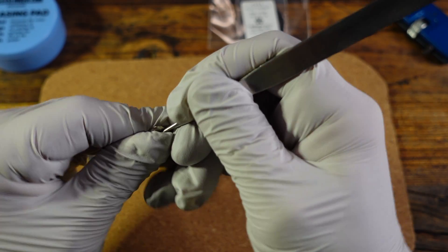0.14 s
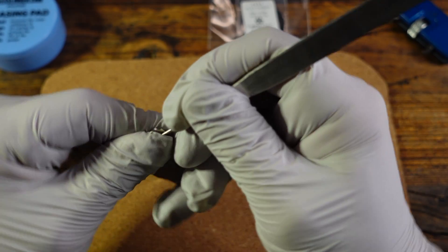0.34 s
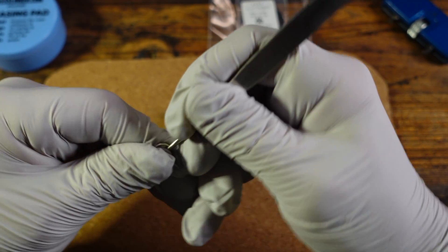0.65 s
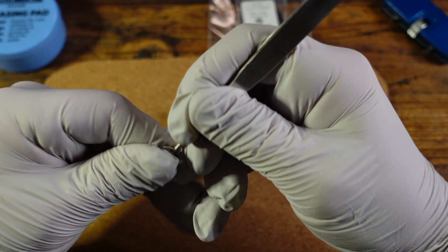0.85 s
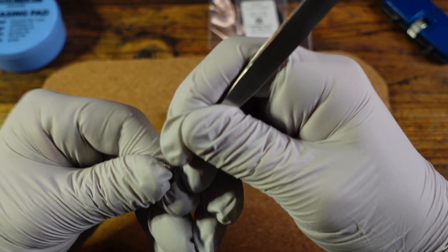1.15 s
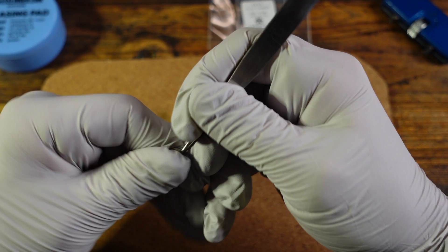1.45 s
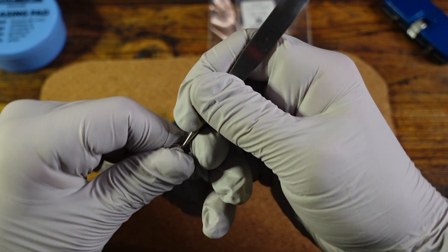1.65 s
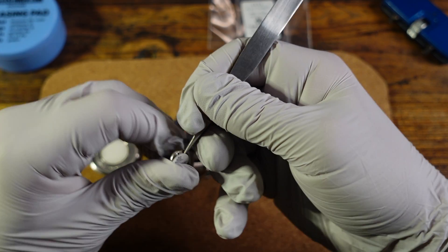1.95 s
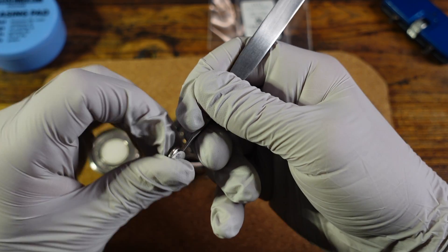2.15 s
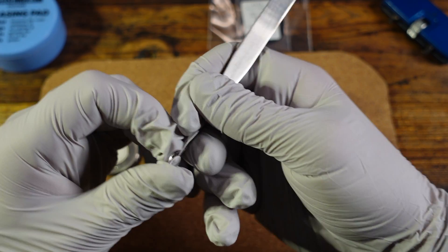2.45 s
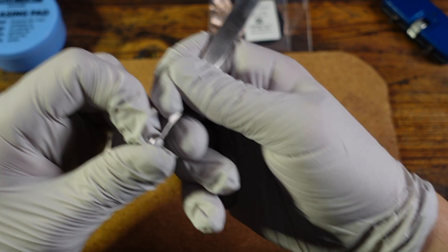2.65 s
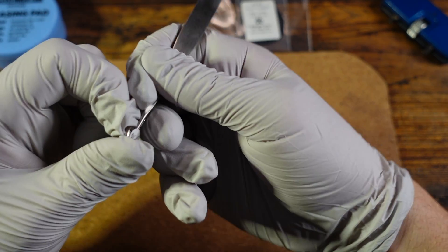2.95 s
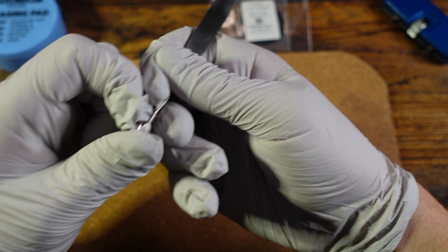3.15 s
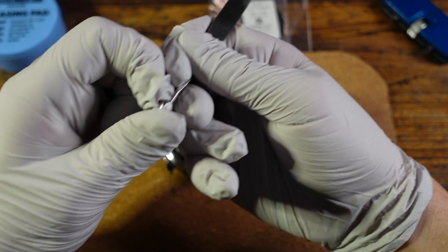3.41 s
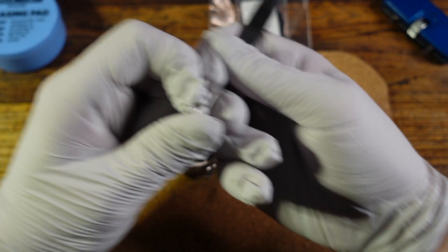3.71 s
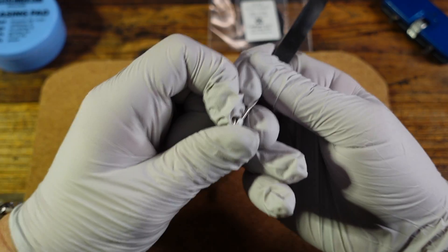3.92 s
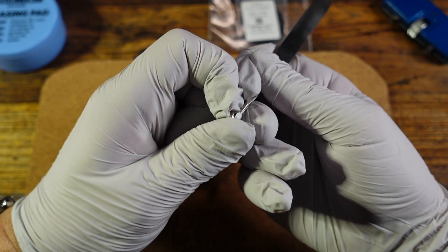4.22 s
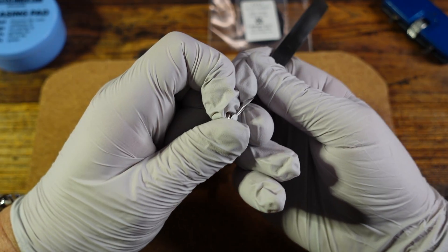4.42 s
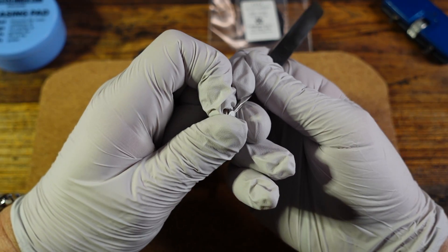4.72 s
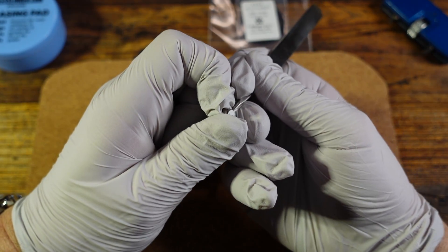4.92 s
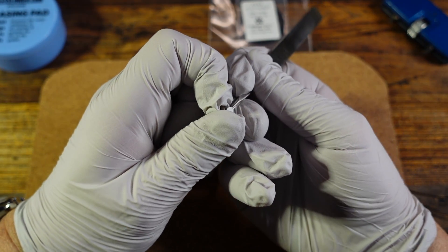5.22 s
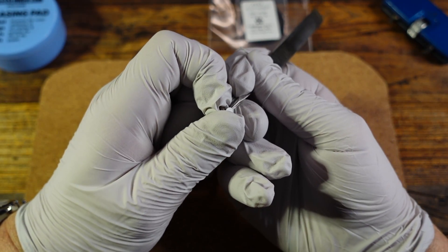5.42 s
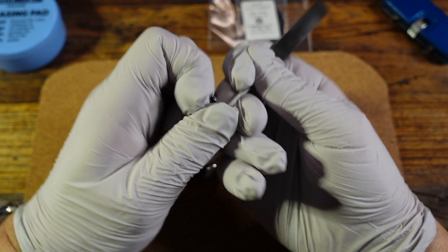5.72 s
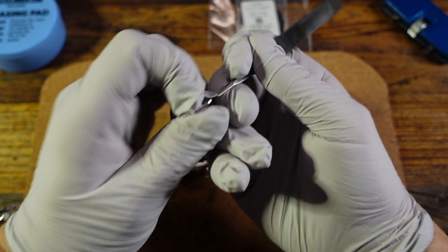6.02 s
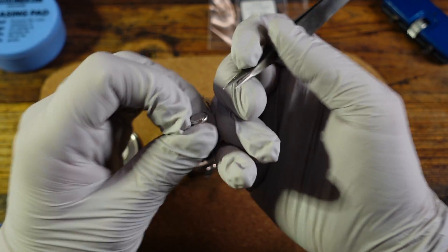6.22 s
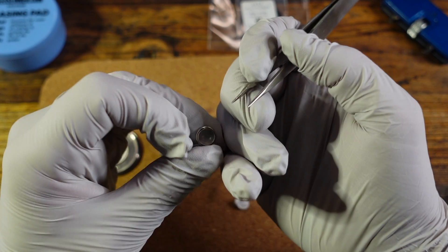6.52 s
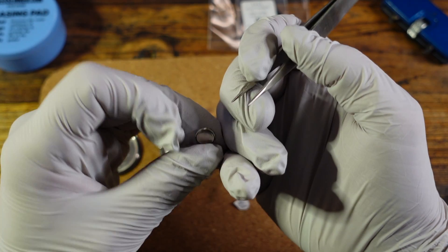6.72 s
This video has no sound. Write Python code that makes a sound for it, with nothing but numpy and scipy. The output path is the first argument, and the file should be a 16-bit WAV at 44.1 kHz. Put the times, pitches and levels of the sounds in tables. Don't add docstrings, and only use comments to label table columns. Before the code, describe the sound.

Tweezers tick, snap and scrape on a tiny metal cell at a wooden bench, soft thuds and distant knocks over quiet room hum.

```python
import sys
import numpy as np
from scipy import signal
from scipy.fft import rfft, irfft, next_fast_len
from scipy.io import wavfile
from scipy.ndimage import uniform_filter1d

SR = 44100
rng = np.random.default_rng(int(sys.argv[2]) if len(sys.argv) > 2 else 0)


def volts(x):
    e = np.asarray(x, float) / 20
    return 10 ** e


def store_wav(level_fs):
    pcm = np.round(np.clip(np.atleast_2d(level_fs), -1, 1) * 32767)
    wavfile.write(sys.argv[1], SR, pcm.T.astype(np.int16))


N = 302460


def unit(x):
    return x / np.sqrt(np.mean(x ** 2) + 1e-20)


def along(points, hz):
    f, v = np.transpose(points)
    return np.interp(np.log(hz + 1), np.log(f + 1), v)


def add(track, s, sound):
    part = track[round(s * SR):][:len(sound)]
    part += sound[:len(part)]


def ring(hz, gains, t60, attack):
    t = np.arange(int(np.clip(np.max(t60), .002, .4) * SR))[:, None] / SR
    decay = np.exp(-np.log(1000) * t / t60)
    x = (gains * decay * np.sin(2 * np.pi * hz * t)).sum(1)
    x = x * (1 - np.exp(-t[:, 0] / attack))
    return x / np.abs(x).max()


def shaped(gain, size=256):
    hz, t, z = signal.stft(rng.standard_normal(N), SR, nperseg=size)
    return signal.istft(z * gain(hz[:, None], t), SR, nperseg=size)[1][:N]


def filtered(x, response):
    m = next_fast_len(N + SR // 2)
    return irfft(rfft(x, m) * response(np.fft.rfftfreq(m, 1 / SR)), m)[..., :N]


def resonance(hz, centre_hz, width_hz):
    return 1j * hz * width_hz / (centre_hz ** 2 - hz ** 2 + 1j * hz * width_hz)


def noise_band(centre_hz, width_hz):
    return unit(filtered(rng.standard_normal(N), lambda hz: resonance(hz, centre_hz, width_hz) ** 2))


def stroke(t, start, end, db, fade):
    outside = np.maximum(np.maximum(start - t, t - end), 0)
    return volts(db - 20 * outside / fade)


def power(rows, t):
    return sum(stroke(t, *row) ** 2 for row in rows)


# frequency_hz, level_db [dB per Hz]
FLOOR = [(25, -30), (45, -11), (100, -14), (150, -11), (220, -13), (323, -16), (400, -18.5), (500, -23.5),
         (800, -21), (1240, -26.5), (2800, -29), (13900, -31.5), (15800, -33), (16500, -52)]
# centre_hz, width_hz, level_db
MACHINE = [
    (149.85, 10, -71.5),
    (800, 77, -79),
    (22.04, 3, -70),
]


def floor():
    def gain(hz, t):
        field = rng.standard_normal((len(hz), len(t)))
        field = uniform_filter1d(uniform_filter1d(field, 3, 0), 4, 1)
        wander_db = 1.1 * unit(field) / (1 + hz / 900)
        return volts(along(FLOOR, hz) + wander_db)
    hum = sum(volts(db) * noise_band(centre_hz, width_hz) for centre_hz, width_hz, db in MACHINE)
    return volts(-63.5) * unit(shaped(gain, size=4096)) + hum


# frequency_hz, t60_s
ROOM = [(200, 0.34), (2000, 0.49), (6000, 0.36), (15000, 0.22)]
# delay_s, level_db, blur_s
WALLS = [
    (.004, -15.5, .001),
    (.0067, -22.5, .0008),
    (0.0105, -15, .0013),
    (.021, -37, .001),
]


def room(x):
    hz, t, z = signal.stft(rng.standard_normal(SR // 2), SR, nperseg=256)
    decay = volts(-60 * t / along(ROOM, hz)[:, None])
    tail = signal.istft(z * decay, SR, nperseg=256)[1]
    answer = volts(-13.5) * tail / np.linalg.norm(tail)
    age = np.arange(len(tail)) / SR
    for delay_s, db, blur_s in WALLS:
        echo = rng.standard_normal(len(tail)) * np.exp(-((age - delay_s) / blur_s) ** 2 / 2)
        answer = answer + volts(db) * echo / np.linalg.norm(echo)
    return signal.fftconvolve(x, answer)[:N]


# start_s, level_db [peak], tilt_db [per octave], t60_s, panel_hz
KNOCKS = [
    (4.465, -39.5, -6.5, 0.51, 1490),
    (4.719, -42, -2, 0.53, 880),
    (4.868, -42.5, -4.5, 0.48, 1000),
    (5.071, -51.5, 0, 0.42, 1400),
    (5.799, -39.5, -3.5, 0.55, 905),
]
# centre_hz, width_hz, level_db
CUPBOARD = [(431, 35, -7), (785, 24, -5), (935, 14, -16.5), (1050, 38, -6.5), (1330, 14, -13),
            (1470, 17, -5), (1612, 26, -12.5), (2060, 14, -10), (2480, 22, -26)]


def knocks():
    def gain(hz, t):
        total = 0
        for s, db, tilt_db, t60, panel_hz in KNOCKS:
            age = np.maximum(t - s, 0)
            life = t60 * (1 + hz / 3000) ** -.6
            panel = 1 + 0.91 * np.abs(resonance(hz, panel_hz, 440))
            fall = volts(db + 14.0 + tilt_db * np.log2(1 + hz / 2000) - 60 * age / life)
            total = total + panel * fall * (1 - np.exp(-age / 0.0015))
        return total

    def body(hz):
        response = volts(-15.5) * resonance(hz, 990, 1640)
        for k, (centre_hz, width_hz, db) in enumerate(CUPBOARD):
            response = response + (-1) ** k * volts(db) * resonance(hz, centre_hz, width_hz)
        return response

    blows = np.zeros(N)
    for s, db, *_ in KNOCKS:
        add(blows, s + 0.003, volts([db + 28.5]))
    return filtered(shaped(gain, size=192) + blows, body)


# start_s, end_s, level_db, fade_s
GROANS = [
    (2.25, 2.354, -66.5, .1),
    (2.53, 2.58, -62, .05),
    (2.68, 2.8, -64.5, 0.065),
    (3.0, 3.09, -67.5, .06),
    (3.743, 3.86, -66, .06),
]


def groans():
    leaning = volts(-2.0) * power_free_sum(GROANS, np.arange(N) / SR)
    return leaning * noise_band(centre_hz=213, width_hz=87)


def power_free_sum(rows, t):
    return sum(stroke(t, *row) for row in rows)


# frequency_hz, level_db [dB per Hz]
CREAK = [(150, -29), (300, -1), (600, -2), (900, -5.5), (1500, -19), (4000, -34)]
# frequency_hz, level_db [dB per Hz]
SLIDE = [(500, -37), (1000, -2), (1300, 1.5), (2000, -4.5), (3000, -5), (5000, -19.5), (12000, -44)]
# start_s, end_s, level_db, fade_s
CREAKS = [(.37, .53, -63.5, 0.22), (.885, .96, -61.5, 0.057), (1.0, 1.3, -65, 0.029),
          (1.35, 1.43, -61.5, 0.035), (1.47, 1.64, -62.5, 0.11), (2.095, 2.11, -68.5, .06),
          (2.3, 2.42, -70.5, .25), (2.65, 2.9, -65, 0.3), (3.72, 3.93, -65.5, 0.11),
          (4.155, 4.28, -70, 0.082), (5.84, 5.88, -68.5, 0.13), (6.02, 6.04, -64.5, 0.13),
          (6.11, 6.33, -67, 0.11)]
# start_s, end_s, level_db, fade_s
SLIDES = [(.37, .6, -72.5, 0.076), (.93, .97, -71.5, 0.08), (1.41, 1.58, -72, 0.085),
          (2.095, 2.11, -83, .05), (2.61, 2.85, -64.5, .27), (3.4, 3.47, -65.5, .2),
          (3.745, 3.995, -62.5, .04), (4.16, 4.28, -72, .05), (5.84, 5.96, -73, 0.12),
          (6.01, 6.04, -70, 0.063), (6.1, 6.15, -68.5, 0.29)]


def cloth_power(hz, t):
    gloves = volts(along(CREAK, hz) + 14.5) ** 2 * power(CREAKS, t)
    sleeves = volts(along(SLIDE, hz) + 11) ** 2 * power(SLIDES, t)
    return gloves + sleeves


# start_s, end_s, level_db, fade_s
RUSTLES = [
    (.51, .6, -71, .06),
    (2.0, 2.01, -72, .07),
    (2.09, 2.11, -70, .04),
    (2.165, 2.18, -72, 0.037),
    (2.6, 2.69, -67, 0.17),
    (2.8, 2.98, -69, 0.11),
    (3.41, 3.46, -75, 0.23),
    (3.74, 3.9, -65, 0.16),
]
# start_s, end_s, level_db, resonance_hz
SCRAPES = [
    (.882, 0.96, -69, 4480),
    (1.0, 1.298, -77.5, 4930),
    (1.41, 1.559, -65, 4620),
    (5.84, 5.95, -70.5, 5100),
    (6.01, 6.046, -66.5, 4870),
    (6.109, 6.17, -65, 6500),
    (6.36, 6.4, -77, 4900),
]


def tip_power(hz, t):
    def metal(db, peak_hz):
        notch = volts(-6) * resonance(hz, 0.6 * peak_hz, 460)
        return volts(db) * np.abs(resonance(hz, peak_hz, 660) - notch) ** 2

    rubber = 0.35 * np.abs(resonance(hz, 3800, 4300))
    total = power(RUSTLES, t) * (metal(-9, 5100) ** 2 + rubber ** 2)
    for start, end, db, peak_hz in SCRAPES:
        drag = stroke(t, start, end, db, fade=.06)
        total = total + drag ** 2 * (metal(-0.5, peak_hz) ** 2 + rubber ** 2)
    return volts(14.5) ** 2 * total


def rubs():
    grip = unit(uniform_filter1d(rng.standard_normal(N), 300))
    grain = unit(volts(1.5 * grip))
    return shaped(lambda hz, t: np.sqrt(cloth_power(hz, t) + tip_power(hz, t))) * grain


# start_s, level_db [peak], centre_hz
THUDS = [(1.2, -50.5, 300), (1.367, -47, 540), (1.397, -48, 410), (1.517, -43.5, 516), (1.5159, -53, 1000),
         (1.882, -36, 800), (1.9554, -49, 910), (1.959, -40.5, 854), (2.224, -63, 500), (2.31, -57, 590),
         (2.335, -63, 500), (2.781, -45, 219), (4.163, -51.5, 300), (4.236, -49, 300), (5.686, -24.5, 319),
         (5.6943, -42.5, 196), (5.7291, -35.5, 760), (5.7303, -34.5, 242)]
# start_s, level_db [peak], centre_hz
RAPS = [
    (.1605, -51, 950),
    (0.3054, -40, 402),
    (0.3054, -39, 1050),
    (0.934, -49, 620),
    (0.947, -50, 500),
    (5.6825, -33, 800),
    (6.506, -43, 914),
]
# mode_hz, level_db, t60_s
BENCH = [
    (104.4, -12.5, 0.17),
    (253, -31.5, 0.064),
    (379, -19, 0.084),
]


def thuds():
    out = np.zeros(N)
    bench_hz, bench_db, bench_t60 = np.transpose(BENCH)
    octaves = np.array([-0.87, -0.233, 0.042, 0.38, 0.89])
    push_gains = volts([-12.5, 0, 4.5, -4.0, -6.5])
    for rows, cycles in [(THUDS, 10.5), (RAPS, 19.4)]:
        for s, db, hz in rows:
            push_hz = hz * 2 ** (octaves + 0.091 * rng.standard_normal(5))
            push = ring(push_hz, push_gains, cycles / hz, attack=0.00049)
            near = np.exp(-np.log2(bench_hz / hz) ** 2 / 1.85)
            driven = near * volts(bench_db)
            wood = ring(bench_hz, driven, bench_t60, attack=0.005) * driven.sum()
            add(out, s, volts(db + 0.5) * push)
            add(out, s, volts(db + 4.0) * wood)
    return out


# mode_hz, level_db, t60_s
STEEL = [(1400, 2.5, 0.0068), (2055, 1, 0.013), (2450, 1, 0.0014), (3430, 1, 0.0021), (4620, -0.5, 0.0048),
         (5600, 0.5, 0.0034), (6460, -0.5, 0.0039), (7830, 2.5, 0.0054), (8480, -3.5, 0.0033),
         (9550, 0.5, 0.0039), (10800, -2, 0.0057), (13390, 0.5, 0.0018), (14200, 2.5, 0.0077),
         (15320, -3, 0.0032)]
# start_s, level_db [peak], pitch_hz [ring nearest the contact]
TAPS = [
    (0.3057, -27, 3900),
    (1.201, -51, 2450),
    (1.677, -45, 2700),
    (2.0994, -43, 3220),
    (2.1748, -51.5, 6800),
]
NUDGES = [
    (0.1608, -35, 1710),
    (2.0741, -50, 2210),
]
SLIPS = [
    (0.8832, -46, 4300),
    (2.7823, -46, 5230),
    (5.68, -25.5, 5600),
    (5.81, -41.5, 5600),
    (5.8945, -45.5, 5240),
    (6.289, -54, 5600),
]
FLICKS = [
    (1.3956, -33.5, 3970),
    (1.6451, -45.5, 3820),
    (1.8818, -7.5, 6650),
    (6.4582, -50, 3010),
]
TEARS = [
    (5.6826, -16, 5600),
    (5.6835, -18, 5540),
    (5.686, -9, 5270),
    (5.688, -25, 5000),
]
PINGS = [
    (6.1704, -47, 10800),
    (6.2656, -50, 10800),
    (6.4088, -58, 10600),
    (6.428, -31, 9550),
    (6.433, -46, 9550),
]
CLACKS = [
    (6.5052, -30.5, 1570),
    (6.509, -43, 2050),
    (6.5155, -44, 2010),
    (6.568, -34.5, 1660),
    (6.5771, -44, 1760),
]
RIMS = [
    (6.5605, -33.5, 3600),
    (6.6132, -38.5, 3770),
]
CHIPS = [
    (2.9888, -41.5, 6050),
    (5.8164, -24.5, 6440),
    (6.2312, -46, 5600),
]
DROPS = [
    (1.9589, -26.5, 7130),
    (5.7299, -31.5, 5600),
]
# rows, fall_db [per octave], second_hz, second_db, wall_db [thrown at the walls]
CONTACTS = [
    (TAPS, 11.3, 1100, -9, 0.5),
    (CHIPS, 23, 1800, -15, 0.5),
    (DROPS, 7, 1500, -3.5, -0.5),
    (NUDGES, 5.2, 4400, -7, 0.56),
    (SLIPS, 21, 1460, -3.2, 0.5),
    (FLICKS, 9.6, 17500, 1.5, -0.56),
    (TEARS, 23.4, 12800, -6, -0.27),
    (PINGS, 32, 5100, -5.5, 3),
    (CLACKS, 23, 3050, -9, 4.6),
    (RIMS, 23, 1700, -1.5, 5),
]


def ticks():
    ahead, around = np.zeros(N), np.zeros(N)
    hz, colour_db, t60 = np.transpose(STEEL)
    sign = (-1) ** np.arange(len(hz))
    for rows, fall_db, second_hz, second_db, wall_db in CONTACTS:
        for s, db, main_hz in rows:
            draw = rng.standard_normal((3, len(hz)))
            main = volts(-fall_db * np.abs(np.log2(hz / main_hz)))
            second = volts(second_db - fall_db * np.abs(np.log2(hz / second_hz)))
            gains = np.hypot(main, second) * volts(colour_db + 1.32 * draw[0])
            life = t60 * np.exp(0.15 * draw[1])
            pitch = hz * (1 + 0.035 * draw[2])
            direct = ring(pitch, sign * gains / life, life, attack=0.00022)
            thrown = ring(pitch, sign * gains ** 0.66 / life, 0.5 * life, attack=0.000081)
            add(ahead, s, volts(db + 1.5) * direct)
            add(around, s, volts(db + wall_db) * thrown)
    return np.array([ahead, around])


def scene():
    ahead, around = ticks()
    bench = thuds()
    reflected = room(around + volts(-0.5) * bench)
    mono = ahead + bench + reflected + knocks() + rubs() + groans() + floor()
    return np.array([mono, mono])


def top_cut(x):
    return signal.sosfilt(signal.butter(12, 17200, fs=SR, output="sos"), x)


def record(dry):
    hiss = filtered(rng.standard_normal(N), lambda hz: 1 + (80 / (hz + 12)) ** 2)
    trace = volts(-78.0) * hiss * [[1], [-1]]
    mix = filtered(dry + trace, lambda hz: 1 / (1 + (hz / 15900) ** 60))
    return top_cut(mix)


dry = scene()
out = record(dry)
store_wav(out)
```